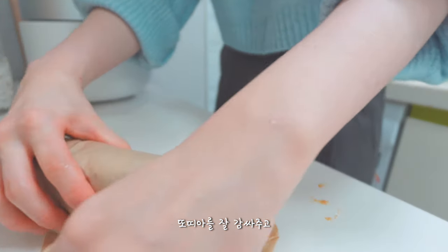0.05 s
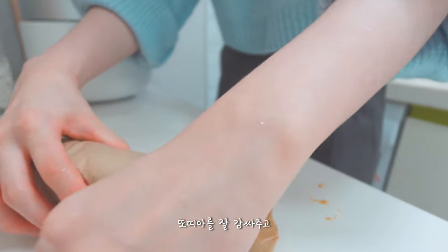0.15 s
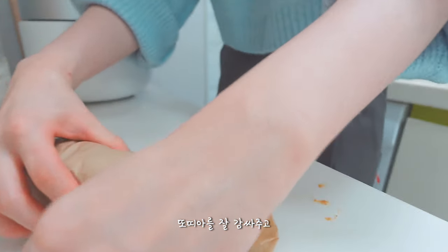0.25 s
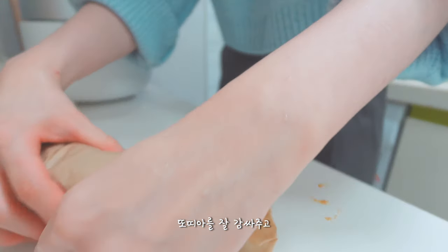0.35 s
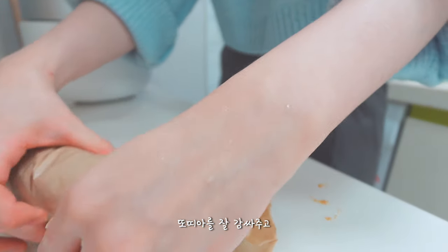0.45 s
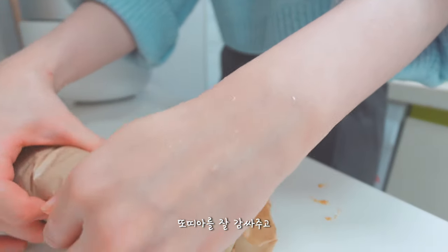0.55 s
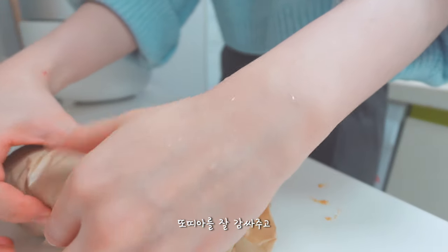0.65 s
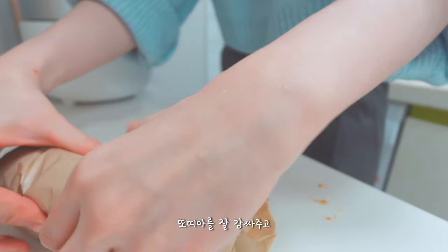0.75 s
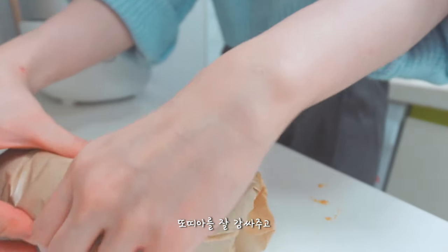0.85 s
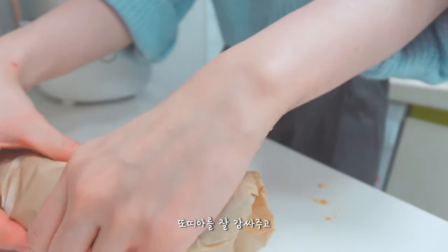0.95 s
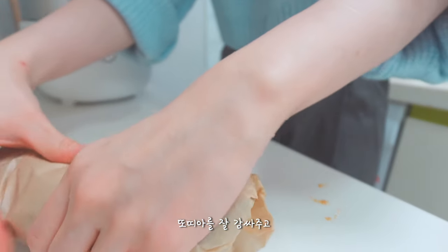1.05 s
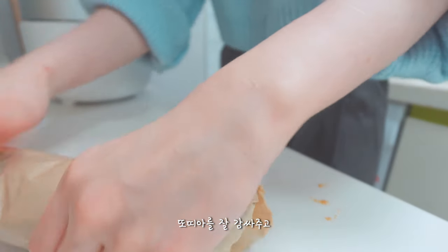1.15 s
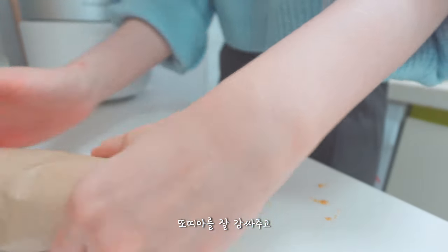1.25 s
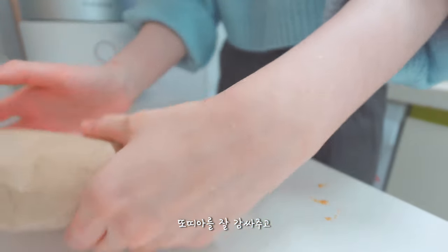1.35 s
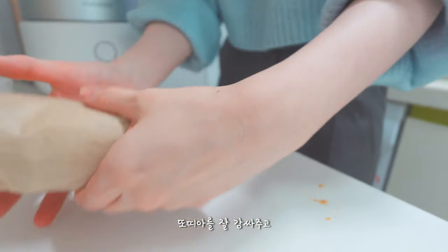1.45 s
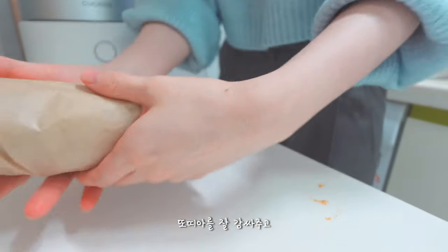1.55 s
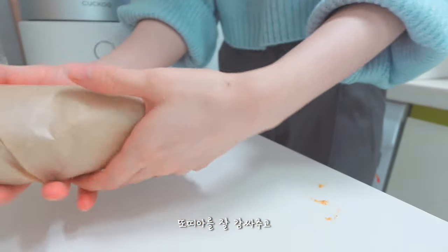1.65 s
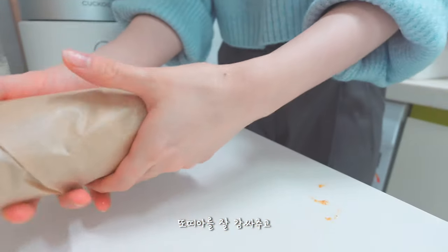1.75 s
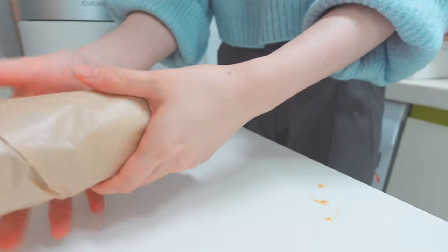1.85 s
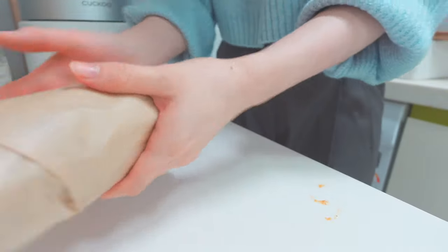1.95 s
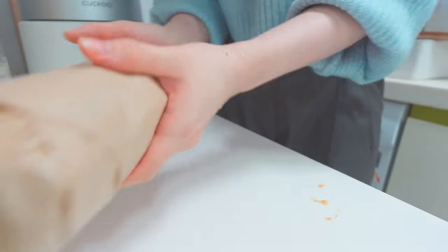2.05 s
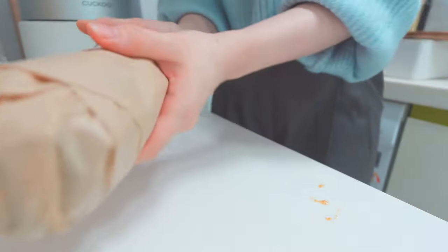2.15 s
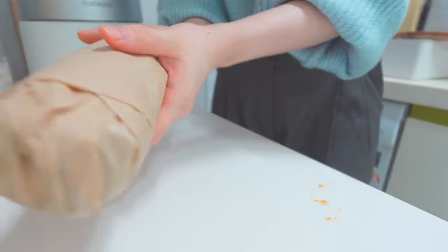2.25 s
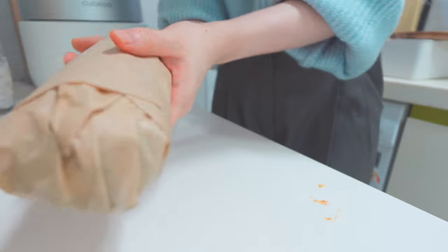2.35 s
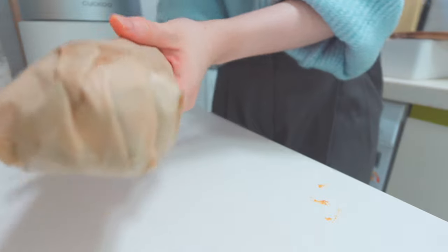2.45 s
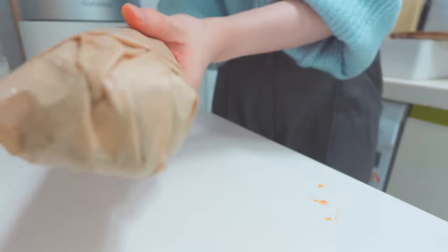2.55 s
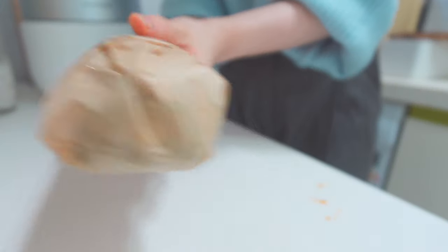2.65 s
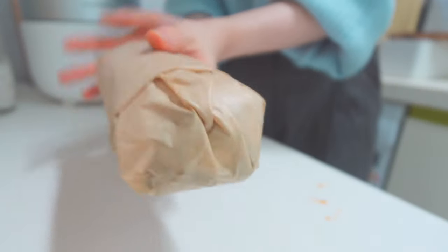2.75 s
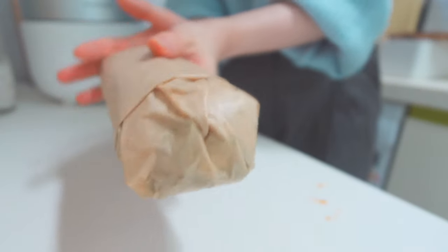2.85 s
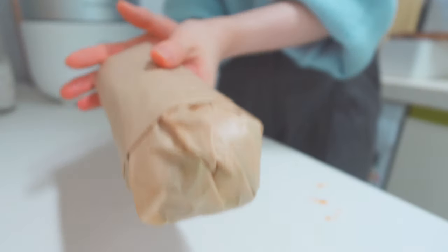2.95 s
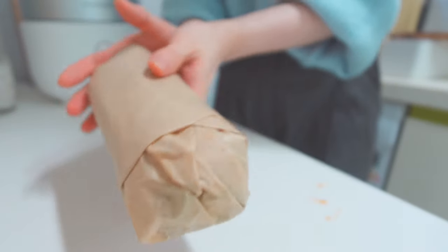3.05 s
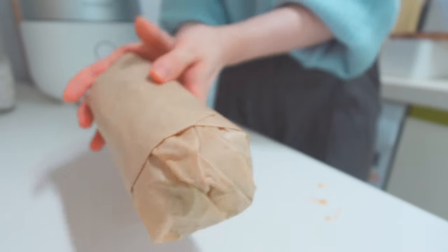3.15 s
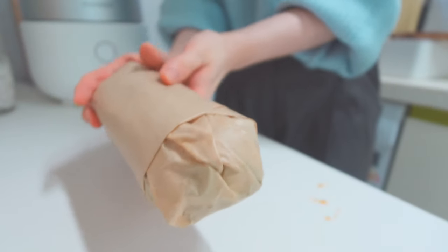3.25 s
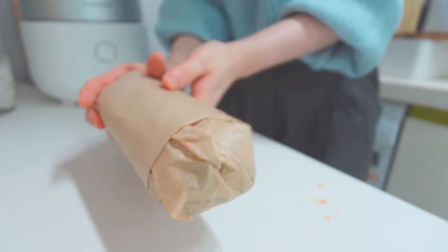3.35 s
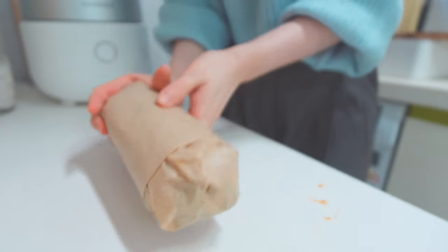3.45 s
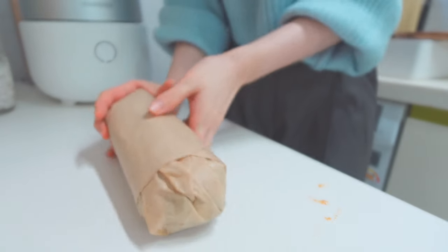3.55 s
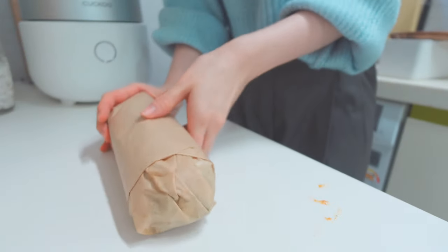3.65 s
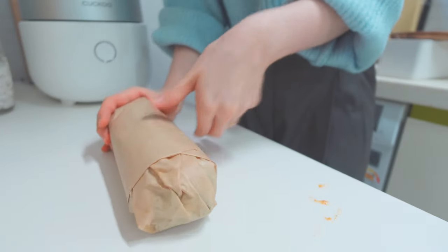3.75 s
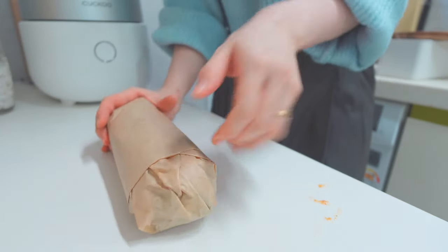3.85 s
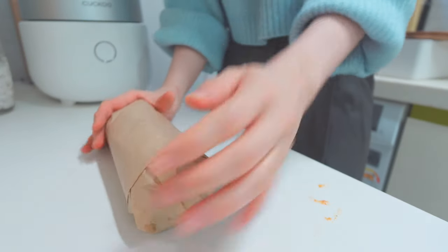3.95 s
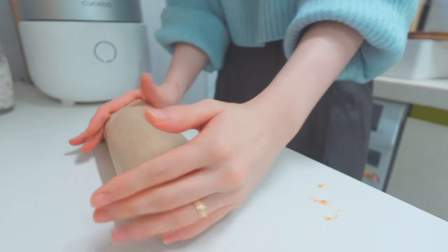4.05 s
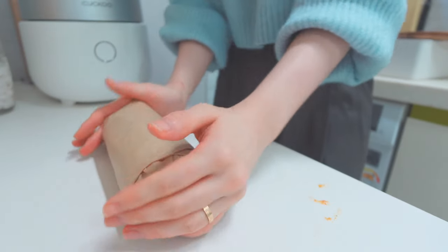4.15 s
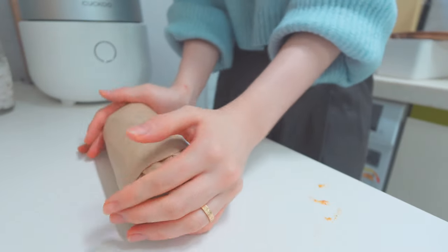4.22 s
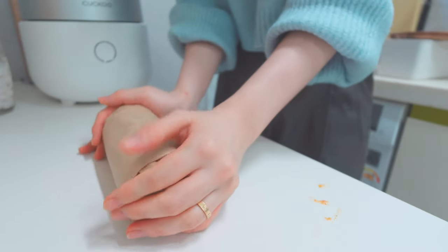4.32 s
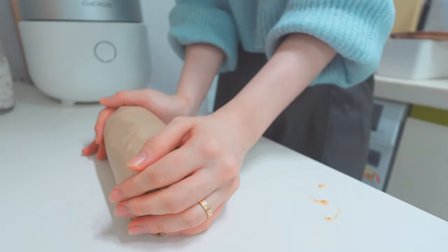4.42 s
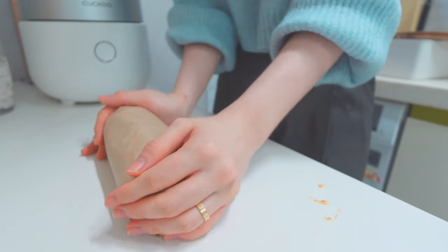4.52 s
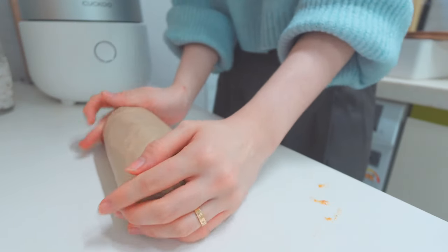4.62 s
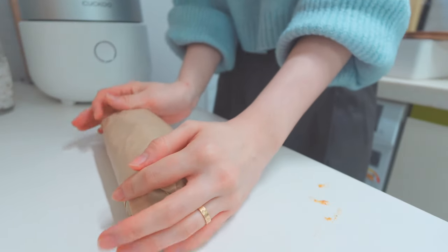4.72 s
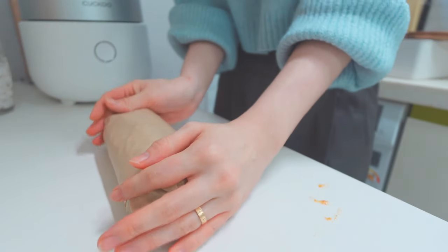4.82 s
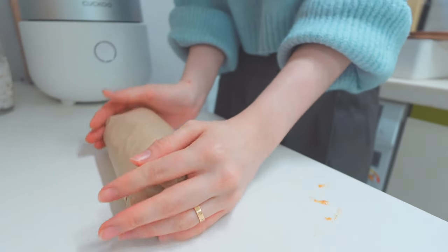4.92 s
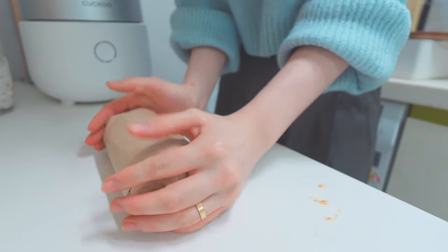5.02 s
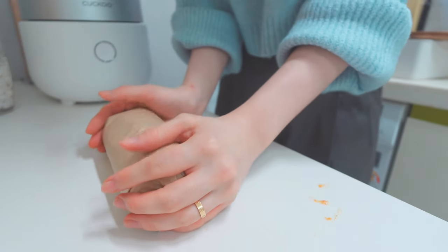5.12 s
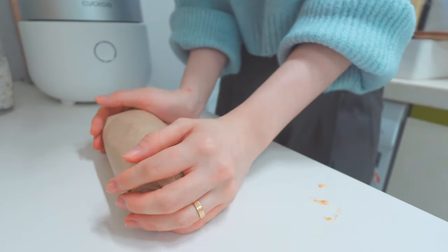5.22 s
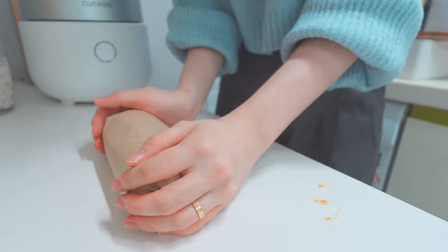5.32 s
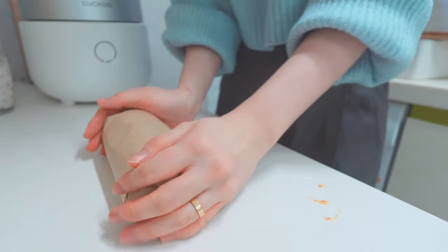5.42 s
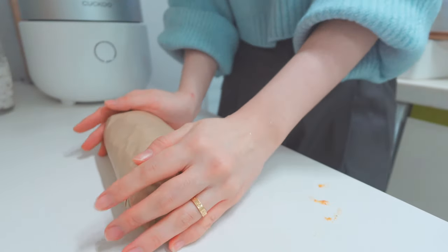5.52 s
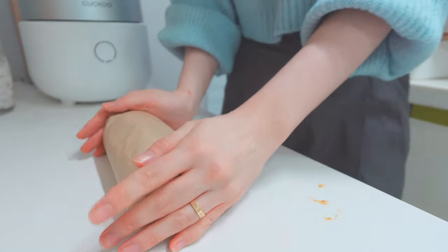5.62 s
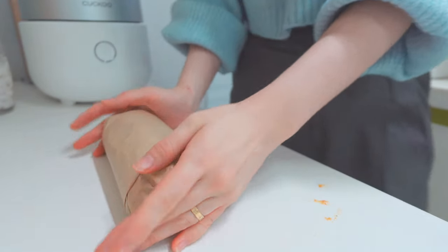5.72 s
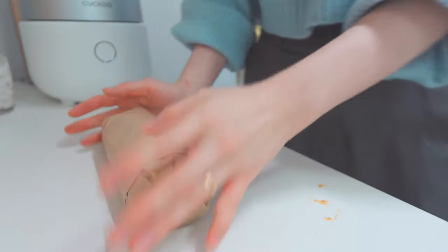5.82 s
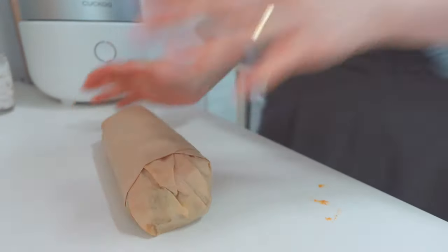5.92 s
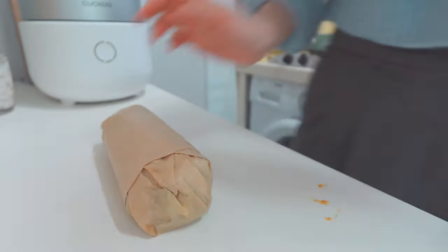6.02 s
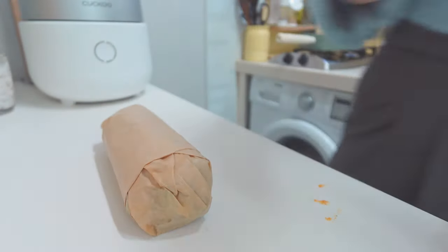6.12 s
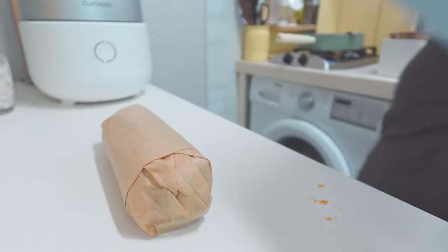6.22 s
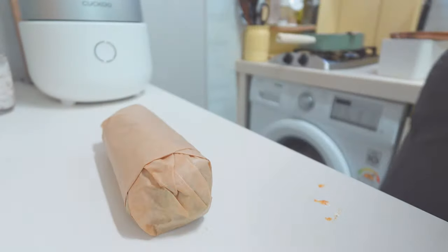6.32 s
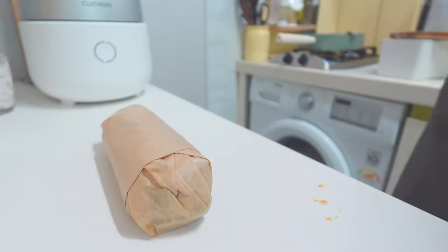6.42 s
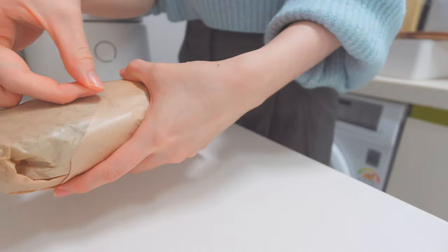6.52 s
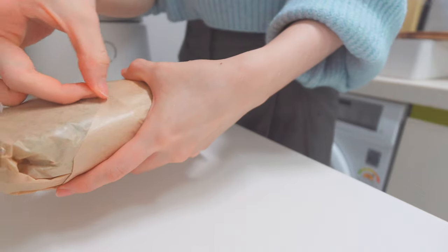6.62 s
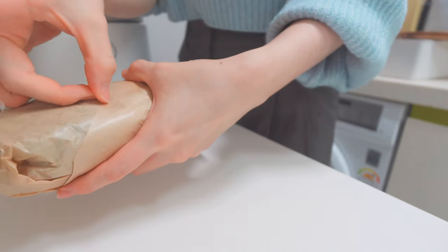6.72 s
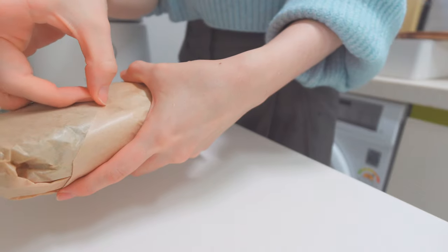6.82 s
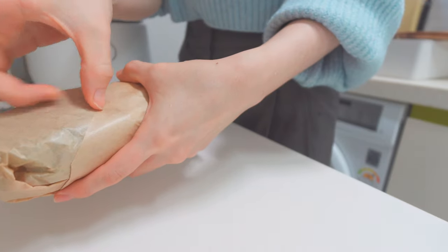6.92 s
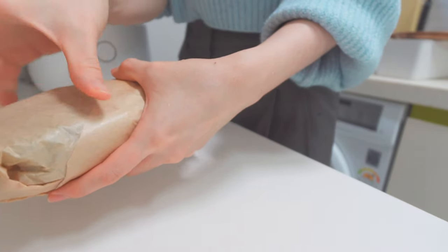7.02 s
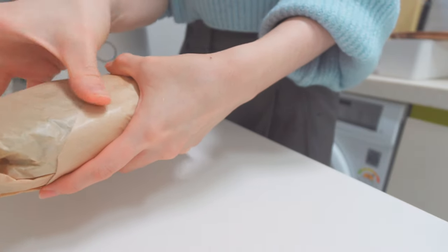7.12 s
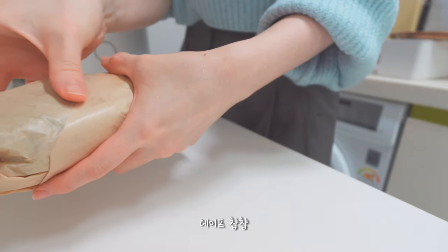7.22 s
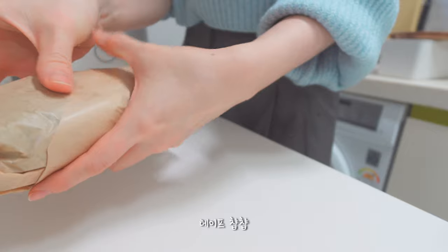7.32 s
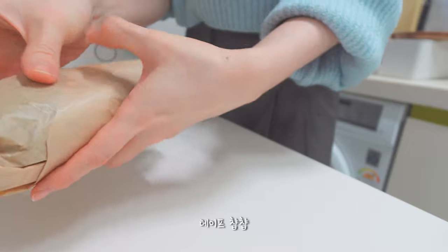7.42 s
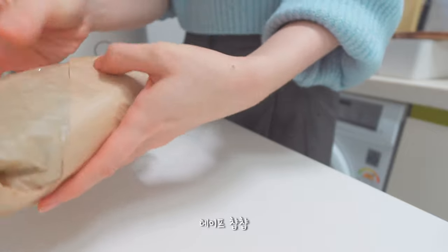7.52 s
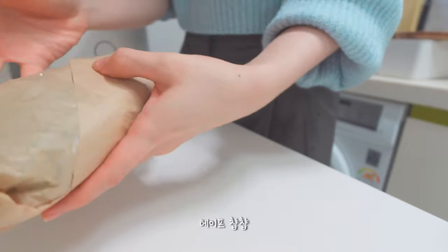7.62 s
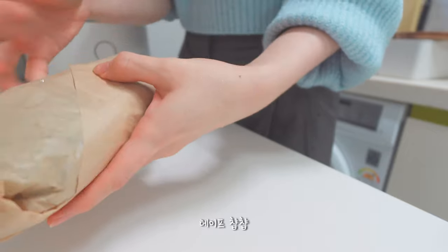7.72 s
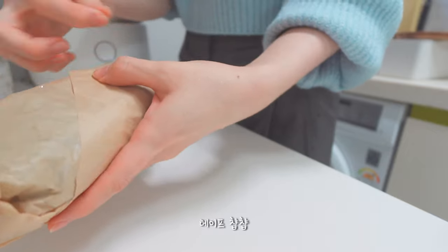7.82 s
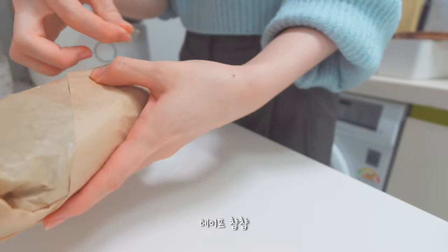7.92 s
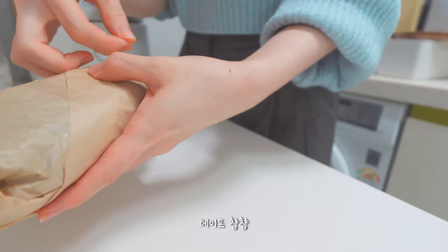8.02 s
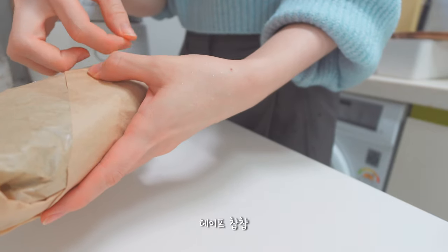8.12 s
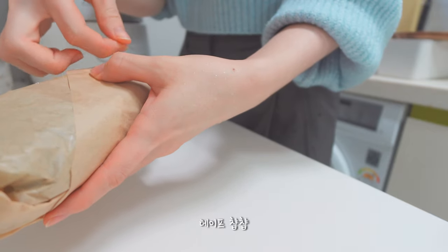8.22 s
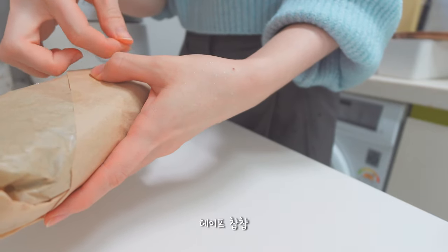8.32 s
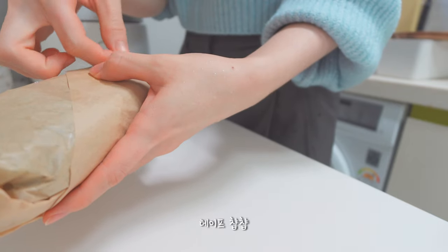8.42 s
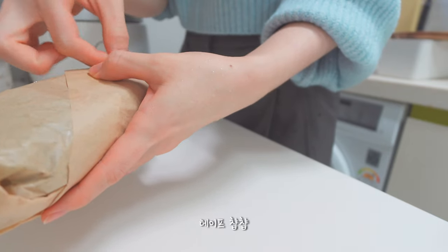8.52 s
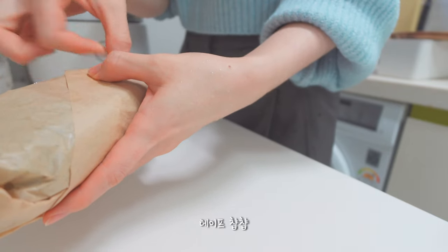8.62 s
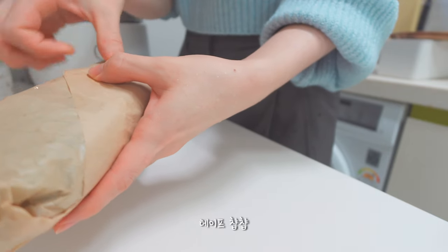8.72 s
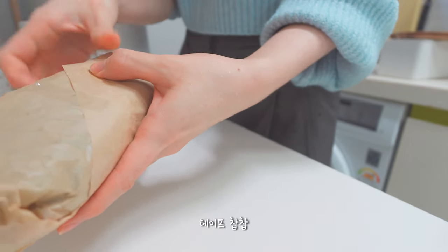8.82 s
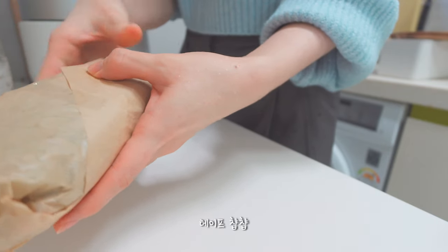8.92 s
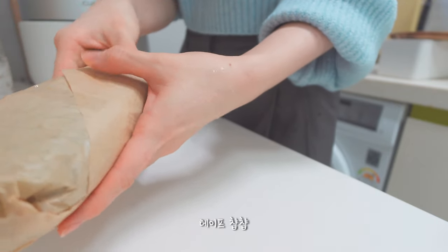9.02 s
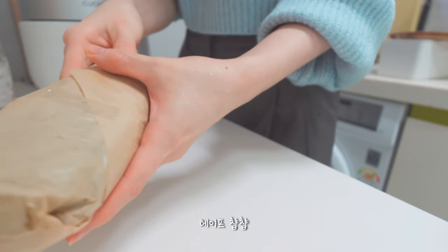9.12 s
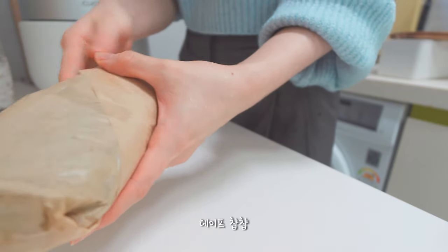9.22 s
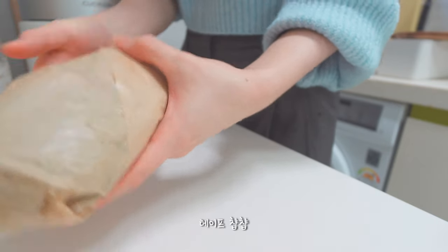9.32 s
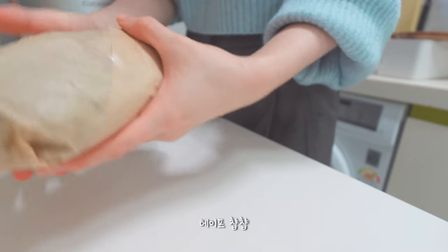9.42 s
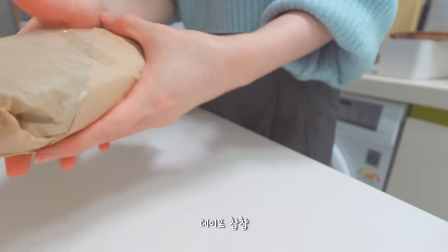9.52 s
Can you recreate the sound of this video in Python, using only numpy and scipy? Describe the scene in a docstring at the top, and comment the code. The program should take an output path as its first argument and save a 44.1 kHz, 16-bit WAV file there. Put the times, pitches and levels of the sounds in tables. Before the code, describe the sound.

Very close paper handling in a small, reflective kitchen: bright snaps over fine crinkling and rubbing, with soft, dull bumps of the roll on the counter. Activity is thickest in the first second, continues in irregular clusters to about six seconds, then thins to quiet rustles and isolated ticks. A faint steady motor hum stays underneath, the same on both sides.

```python
"""On a kitchen counter, hands roll a filled wrap in baking paper, turn it, press it and hold it shut.
At close range the stiff sheet buckles in sharp snaps over a bed of tiny creases and rubbing noise.
The soft roll bumps the counter as dull noise bursts; taut facets squeak as narrow ones.
A small hard room answers with near echoes and a diffuse tail, and an appliance hums behind.
One close microphone hears it all, the same signal on both channels."""
import sys
import numpy as np
from scipy import signal
from scipy.fft import rfft, irfft, next_fast_len
from scipy.io import wavfile
from scipy.ndimage import uniform_filter1d, minimum_filter1d, map_coordinates

SR = 44100
rng = np.random.default_rng(int(sys.argv[2]) if len(sys.argv) > 2 else 0)


def transcribe(signal):
    """Save signal, clipped to [-1, 1], as a 16-bit WAV file at the path in sys.argv[1]."""
    frames = np.atleast_2d(signal).T
    limited = np.clip(frames, -1, 1)
    pcm = np.round(limited * 32767).astype(np.int16)
    wavfile.write(sys.argv[1], SR, pcm)


N = 421596  # samples


def amp(db):
    """Decibels to amplitude."""
    return 10 ** (np.asarray(db) / 20)


def unit(x):
    """Each row at rms 1."""
    return x / np.sqrt(np.mean(x ** 2, axis=-1, keepdims=True) + 1e-20)


def along(points, hz):
    """Interpolate (f/Hz, value) points on a log frequency axis."""
    f, v = np.transpose(points)
    return np.interp(np.log(hz + 1), np.log(f), v)


def curve(points):
    """Interpolate (t/s, level/dB) points to one level per sample."""
    s, db = np.transpose(points)
    return np.interp(np.arange(N) / SR, s, db)


def wobble(rate):
    """A smooth random curve with rate knots a second."""
    knots = rng.standard_normal(int(N * rate / SR) + 4)
    return map_coordinates(knots, [np.arange(N) * rate / SR])


def filtered(x, response):
    """Filter x by a gain that is a function of frequency in Hz."""
    m = next_fast_len(N + SR // 2)
    hz = np.fft.rfftfreq(m, 1 / SR)
    return irfft(rfft(x, m) * response(hz), m)[:N]


def noise(spectrum):
    """Coloured noise of rms 1."""
    return unit(filtered(rng.standard_normal(N), lambda hz: amp(along(spectrum, hz))))


def causal(gain):
    """Minimum-phase response for each row of gains: sharp start, ringing afterwards."""
    cepstrum = irfft(np.log(np.maximum(gain, 1e-6)))
    half = cepstrum.shape[-1] // 2
    cepstrum[..., 1:half] *= 2
    cepstrum[..., half + 1:] = 0
    return np.exp(rfft(cepstrum))


def resonance(hz, centre, q):
    """Gain of a resonant band around each centre frequency."""
    ratio = (hz + 1) / centre[:, None]
    return 1 / np.sqrt(1 + (q * (ratio - 1 / ratio)) ** 2)


def placed(times, rows):
    """Sum the rows, each starting at its time in seconds."""
    start = np.round(np.maximum(times, 0) * SR).astype(int)
    index = start[:, None] + np.arange(rows.shape[1])
    return np.bincount(index.ravel(), rows.ravel(), N)[:N]


# How the sheet radiates a buckle: f/Hz, relative level/dB
PAPER_RADIATION = [(100, -43.5), (400, -4.5), (680, -5.5), (950, 1), (1600, 0.5), (4000, -0.5), (7000, -5),
                   (10000, -9), (15500, -19.5)]


def buckles(pitch, q, flutter, t60, detune, size=512):
    """A facet and its neighbour flip in one jolt, then flutter briefly; one pulse of energy 1 per pitch."""
    t, hz = np.arange(size) / SR, np.fft.rfftfreq(size, 1 / SR)
    force = flutter * rng.standard_normal((len(pitch), size)) * amp(-60 * t / t60)
    force[:, 0] += rng.choice([-1, 1], len(pitch))  # the jolt, to either side
    neighbour = pitch * np.exp(detune * rng.standard_normal(len(pitch)))
    facets = resonance(hz, pitch, q) + 1.02 * resonance(hz, neighbour, 2 * q)
    colour = facets * amp(along(PAPER_RADIATION, hz))
    return unit(irfft(rfft(force) * causal(colour))) / np.sqrt(size)


# The few big creases that snap through: t/s, relative level/dB, pitch of the buckling facet f/Hz
SNAPS = [(.04, -37.5, 2950), (.129, -22.5, 2790), (0.1749, -30, 2390), (0.1967, -22.5, 2630),
         (0.2271, -29, 2580), (0.303, -28, 4100), (0.323, -25, 2970), (0.3995, -21.5, 2520),
         (0.4427, -17, 3900), (.517, -28.5, 3200), (0.5585, -32, 2860), (.5865, -30.5, 4650),
         (.66, -21, 3800), (0.6636, -20.5, 3140), (.7629, -24, 2920), (0.8315, -26.5, 3884),
         (0.917, -18.5, 3310), (1.1325, -28, 3460), (1.1885, -29.5, 3985), (1.2198, -32, 1950),
         (1.2292, -27, 4243), (1.5765, -32.5, 4450), (1.6481, -36, 3015), (1.7109, -32.5, 3300),
         (1.7263, -32.5, 3700), (1.7607, -23.5, 3710), (1.8574, -28.5, 3524), (1.9176, -35.5, 3410),
         (2.132, -52.5, 3976), (2.251, -28, 3596), (2.3457, -26, 2363), (2.3823, -22, 4190),
         (2.4681, -24.5, 3167), (2.483, -20, 4900), (2.597, -36.5, 3094), (2.6341, -26, 2970),
         (2.8591, -22, 4160), (2.869, -25, 2860), (2.9337, -27.5, 5760), (3.069, -26, 4920),
         (3.2011, -30, 4245), (3.2939, -28, 4605), (3.3309, -34, 4640), (3.375, -36, 3800),
         (3.4753, -34.5, 3226), (3.5484, -26.5, 3797), (3.589, -23.5, 3434), (3.6422, -28, 3020),
         (3.714, -27, 3540), (3.8031, -33, 3740), (4.1279, -27.5, 3076), (4.1811, -29.5, 3220),
         (4.2177, -24.5, 3193), (4.2941, -20.5, 2147), (4.32, -35, 3195), (4.548, -35, 3438),
         (4.633, -27, 3020), (4.7419, -27, 2400), (4.873, -32, 2450), (4.9206, -18.5, 3604),
         (4.936, -25.5, 3860), (5.015, -28.5, 3600), (5.0558, -28.5, 3645), (5.135, -26.5, 4524),
         (5.1432, -25, 6520), (5.2859, -28.5, 2879), (5.3225, -27.5, 3256), (5.672, -34, 2213),
         (5.7274, -30.5, 3960), (5.8536, -32, 4259), (5.906, -22.5, 3570), (6.525, -40.5, 3587),
         (6.5666, -31, 3706), (6.6749, -35, 3970), (6.8735, -37.5, 5740), (7.1058, -35, 4500),
         (7.1494, -33, 2820), (7.1683, -26, 5080), (7.2614, -26, 5240), (7.5022, -34.5, 4480),
         (7.5546, -33, 2314), (7.6158, -39, 3047), (7.7288, -34, 3870), (8.605, -42, 4880),
         (8.982, -44, 3505), (9.0286, -29, 3780), (9.192, -38, 4770), (9.2526, -38, 5600),
         (9.334, -35, 4910), (9.52, -26.5, 3620), (9.5266, -20, 5400)]


def snaps(q, flutter):
    """The loud creases; each one creaks with two weaker slips just before it gives way."""
    s, db, pitch = np.transpose(SNAPS)
    size = amp(db + 21.5)[:, None]
    sound = placed(s, size * buckles(pitch, q, flutter, t60=0.011, detune=0.3))
    for lead in rng.uniform(0.0018, 0.018, (2, len(s))):  # seconds ahead of the snap
        slips = size * buckles(pitch, q, flutter, t60=0.007, detune=0.3)
        sound += amp(-27.0) * placed(s - lead, slips)
    return sound


def crackle(per_second, pitch_hz, spread, scatter_db):
    """Tiny creases at uneven moments, many faint and a few strong, following a rate curve."""
    due = np.cumsum(per_second) / SR  # creases due so far
    count = int(due[-1])
    slip, strength, facet = rng.uniform(-1, 1, (count, 3)).T
    sample = np.interp(np.arange(count) + 2 * slip, due, np.arange(N)).astype(int)
    pitch = np.broadcast_to(pitch_hz, N)[sample] * np.exp(spread * facet)
    pulses = buckles(pitch, q=1.82, flutter=0.2, t60=0.011, detune=0.23)
    strength = unit(amp(scatter_db * ((strength + 1) / 2) ** 2))
    return placed(sample / SR, strength[:, None] * pulses) / np.sqrt(per_second.max() / SR)


# Each grip or push that crumples the sheet for a moment:
# start t/s, length t/s, relative rustle body level/dB, relative fine fizz level/dB
GRIPS = [(0, 1.32, -50, -61), (.18, 0.057, -39, -44.5), (0.279, 0.062, -34, -43), (.39, 0.078, -38, -39.5),
         (0.644, 0.024, -35, -31.5), (.83, .11, -46, -55), (.912, .02, -37, -48), (1.106, .13, -43, -50),
         (1.354, .012, -56, -66), (1.565, .035, -48, -49.5), (1.62, .17, -52, -57.5),
         (1.847, 0.039, -43, -51), (2.23, 0.05, -32, -43), (2.329, 0.091, -41, -55),
         (2.463, 0.058, -32, -41.5), (2.551, 0.079, -45, -62), (2.857, .03, -40, -52.5),
         (2.929, .17, -44, -50.5), (3.199, 0.051, -45, -43), (3.28, .22, -48, -54.5),
         (3.546, 0.059, -36, -40), (3.699, 0.031, -35, -45.5), (3.944, .025, -43, -49),
         (4.098, 0.036, -45, -42.5), (4.18, .15, -39, -51), (4.37, .09, -54, -51.5),
         (4.545, 0.051, -53, -57), (4.63, .135, -43, -50), (4.819, 0.34, -46, -52), (4.918, .03, -37, -47),
         (5.269, 0.059, -42, -51.5), (5.43, 0.47, -45, -57.5), (5.819, 0.024, -39, -51),
         (6.55, 0.032, -40, -43), (6.876, 0.039, -52, -43.5), (6.963, .012, -56, -57),
         (7.098, .02, -45, -41.5), (7.149, 0.28, -52, -53.5), (7.45, 0.17, -49, -53.5),
         (8.606, 0.029, -63, -47.5), (9.005, 0.047, -38, -41), (9.08, .08, -54, -53),
         (9.18, 0.08, -46, -46.5), (9.332, 0.081, -53, -53), (9.528, .03, -37, -34)]
GRIP_ATTACK_S, GRIP_RELEASE_DB_PER_S = 0.012, 260  # the fingers close quickly, then the sheet settles
GRIP_TREMOR_DB, GRIP_TREMOR_PER_S = 1.21, 30  # the force of a grip is never quite even
GRIP_TOUCH_S, GRIP_TOUCH_DB = 0.03, -17  # the fingertips land lightly just before they close


def grips():
    """Body and fizz levels in dB: each grip touches, rises, holds and dies away; overlaps add in power."""
    t, power = np.arange(N) / SR, np.full((2, N), 1e-9)

    def rise(s):
        return np.clip((t - s) / GRIP_ATTACK_S + 0.5, 0, 1)

    for start, length, body_db, fizz_db in GRIPS:
        touch = amp(GRIP_TOUCH_DB) * rise(start - GRIP_TOUCH_S)
        closing = np.maximum(rise(start), touch)
        fall = amp(-GRIP_RELEASE_DB_PER_S * np.clip(t - start - length, 0, 1))
        power += (amp([[body_db], [fizz_db]]) * closing * fall) ** 2
    return 10 * np.log10(power) + GRIP_TREMOR_DB * wobble(GRIP_TREMOR_PER_S)


# Body of the paper's rubbing noise: f/Hz, relative level/dB per Hz
RUSTLE_SPECTRUM = [(400, 3), (700, -19), (1000, -17.5), (2000, 2.5), (4200, 5), (7000, -1), (12000, -21.5)]
# Fine treble of the paper's rubbing noise: f/Hz, relative level/dB per Hz
FIZZ_SPECTRUM = [(3000, -14), (6000, -1.5), (7500, -8.5), (10000, -5), (13000, -8), (16000, -6)]
# Palms press the roll and the paper rubs darker: t/s, relative level/dB
PRESS = [(3.9, -65.5), (4.2, -52), (4.5, -59.5), (4.7, -48.5), (5.85, -62.5), (6.15, -72.5)]
FOLDS_PER_S, FOLDS_DB = 24, -9  # middling folds at full effort, and their level against the rustle body


def rustle():
    """Light handling mostly rubs the sheet; firmer handling sets more and more small creases off."""
    body_db, fizz_db = grips()
    effort = np.clip((body_db + 69) / 30, 0.2, 1)
    # a fizzy fingertip touch buckles smaller, higher facets
    pitch_factor = 2 ** (np.clip(fizz_db - body_db, -20, 0) / 20)
    folds = crackle(FOLDS_PER_S * effort, pitch_hz=3660, spread=0.31, scatter_db=8.5)
    creases = crackle(260 * effort, pitch_hz=4000 * pitch_factor, spread=0.73, scatter_db=21.5)
    fine = crackle(220 * effort, pitch_hz=7270, spread=0.595, scatter_db=30.5)
    palm = crackle(400 * effort, pitch_hz=1145, spread=0.3, scatter_db=20)
    crumple = amp(body_db + FOLDS_DB) * folds + amp(body_db - 1.0) * creases
    crumple += amp(fizz_db - 3.0) * fine + amp(curve(PRESS) - 1.5) * palm
    stick_slip = amp(4.7 * effort * wobble(55))  # skin catches and slips on the paper
    rub = amp(body_db - 8.5) * noise(RUSTLE_SPECTRUM) + amp(fizz_db - 8.5) * noise(FIZZ_SPECTRUM)
    return crumple + stick_slip * rub


# Soft, even brushing of hands over the paper: t/s, relative level/dB
BRUSH = [(5.95, -73), (6.03, -53.5), (6.17, -56), (6.29, -53), (6.487, -51.5), (6.495, -100), (8.38, -98.5),
         (8.52, -55.5), (8.62, -78)]


def brushing():
    """Hands slide over the sheet: a smooth hiss without creases."""
    level_db = curve(BRUSH) + 0.9 + 0.47 * wobble(27)
    return amp(level_db) * (noise(RUSTLE_SPECTRUM) + amp(-4.5) * noise(FIZZ_SPECTRUM))


def bursts(table, q, size=16384):
    """Dying noise in a band around each pitch; a higher q makes it narrower and more tonal."""
    s, db, pitch, t60 = np.transpose(table)
    t, hz = np.arange(size) / SR, np.fft.rfftfreq(size, 1 / SR)
    white = rng.standard_normal((len(s), size))
    band = irfft(rfft(white) * resonance(hz, pitch, q) ** 2)
    shape = (1 - np.exp(-t / 0.002)) * amp(-60 * t / t60[:, None])
    level = amp(db) * np.sqrt(np.mean(shape ** 2, axis=1))
    return placed(s, level[:, None] * unit(band * shape))


# The roll and the palms bump the counter; the long row at 1.1 s is a low rub: t/s, level/dB, f/Hz, t60/s
BUMPS = [(.002, -44, 199, 0.32), (.195, -30, 365, 0.057), (.223, -30.5, 356, 0.083),
         (.283, -32, 383, 0.078), (.444, -36.5, 366, 0.079), (.663, -31.5, 262, 0.032),
         (.862, -35, 177, 0.36), (.901, -44, 270, 0.7), (1.1, -48.5, 299.8, 1), (3.546, -36, 115.3, .2),
         (3.714, -45, 169, 0.15), (4.211, -47, 193, 0.7), (4.685, -42.5, 347.8, .16),
         (4.739, -45.5, 344.4, .144), (5.24, -45, 243, .35), (5.29, -46, 248, 0.31)]


def bumps():
    """The soft filling damps each thud, and the low rub, to a broad, dull band."""
    return bursts(BUMPS, q=1.62)


# A taut facet drags and squeaks: t/s, level/dB, f/Hz, t60/s
SQUEAKS = [(2.637, -44, 2400, 0.21), (5.678, -44, 1705, 0.37), (6.72, -57.5, 2834, 0.41)]


def squeaks():
    """Dragging excites a taut facet in a narrow band."""
    return bursts(SQUEAKS, q=8.7)


# Near surfaces around the counter: nominal delay t/s, level/dB
WALLS = [(.0067, -10), (0.0096, -16.5), (0.015, -16)]
# How long the kitchen rings: f/Hz, t60/s
KITCHEN_T60 = [(200, 0.69), (1500, 0.53), (4000, 0.43), (8000, 0.37), (15000, 0.27)]


def kitchen(x, wet_db, count=6):
    """Near surfaces answer, with a diffuse tail; the answers crossfade in turn as the roll moves about."""
    hz, t, z = signal.stft(rng.standard_normal((count, SR // 2)), SR, nperseg=256)
    decay = amp(-60 * t / along(KITCHEN_T60, hz)[:, None])
    build_up = 1 - np.exp(-t / 0.0013)
    tails = unit(signal.istft(z * decay * build_up, SR, nperseg=256)[1])
    tails *= amp(wet_db) / np.sqrt(tails.shape[1])
    for delay, db in WALLS:
        shift = 1 + 0.12 * rng.uniform(-1, 1, count)  # path length differs from place to place
        tails[np.arange(count), (delay * SR * shift).astype(int)] += amp(db)
    place = np.arange(N) / SR * 22 - np.arange(count)[:, None]  # 22 places a second
    share = np.sqrt(np.maximum(1 - np.abs(place % count - 1), 0))
    return signal.fftconvolve(x * share, tails, axes=1)[:, :N].sum(0)


# Appliance rumble and hiss: f/Hz, relative level/dB per Hz
ROOM_TONE = [(25, -23.5), (60, -14.5), (100, 1.5), (170, 1.5), (300, -1.5), (420, -8.5), (540, -24),
             (800, -30), (2400, -32), (5500, -24), (10000, -23), (15800, -22.5)]
# Appliance motor lines: f/Hz, level/dB
HUM = [(59.8, -58), (119.6, -73), (199.5, -63.5), (282, -67.5), (361, -75)]
# A thin electrical whine: t/s, level/dB
WHINE = [(6.3, -91.5), (6.7, -76), (8.4, -80.5), (8.7, -90)]


def appliance():
    """Slightly unsteady motor lines and a thin whine over a low rumble and a faint hiss."""
    t = np.arange(N) / SR

    def tone(hz, drift):
        """A sine of rms 1 whose phase wanders by drift radians."""
        return np.sqrt(2) * np.sin(2 * np.pi * hz * t + drift * wobble(7))

    lowest_hz = HUM[0][0]
    lines = sum(amp(db) * tone(hz, drift=0.13 * hz / lowest_hz) for hz, db in HUM)
    whine = amp(curve(WHINE)) * tone(hz=5570, drift=1.6)
    return lines + whine + amp(-55.0) * noise(ROOM_TONE)


def scene():
    """The close microphone faces one side of each snap; the room gathers all sides, a broader colour."""
    handling = rustle()
    close = snaps(q=1.68, flutter=0.33) + handling + brushing() + bumps() + squeaks()
    room = kitchen(snaps(q=1.1, flutter=0.13) + handling, wet_db=-9.0)
    sound = close + room + appliance()
    return np.array([sound, sound])


TOP_HZ = 16000  # band limit of the recorder


def record(dry, ceiling=0.57):
    """A fast limiter holds the tallest snaps; a steep low-pass then sets the recorder's band limit."""
    needed = np.minimum(1, ceiling / (np.abs(dry).max(0) + 1e-9))
    limited = dry * uniform_filter1d(minimum_filter1d(needed, size=65), size=45)
    return np.array([filtered(side, lambda hz: 1 / (1 + (hz / TOP_HZ) ** 120)) for side in limited])


dry = scene()
out = record(dry)
transcribe(out)
```